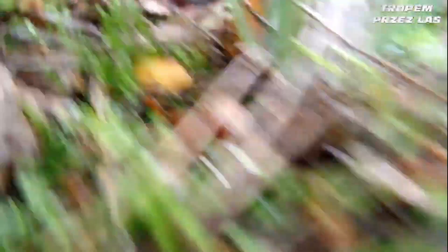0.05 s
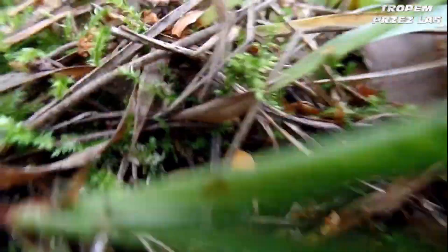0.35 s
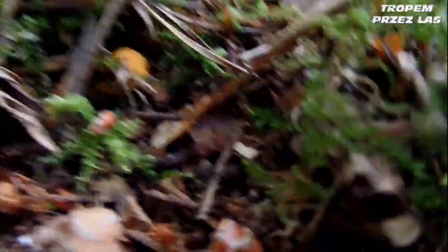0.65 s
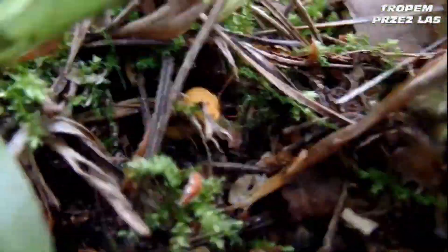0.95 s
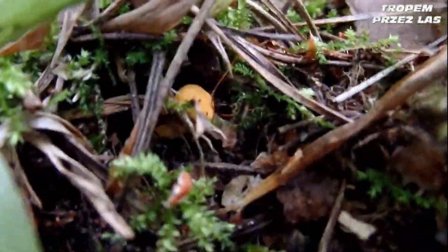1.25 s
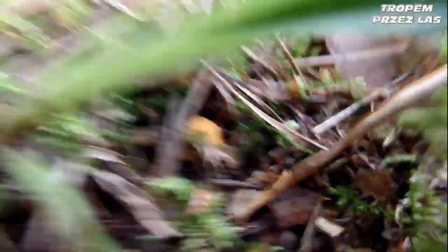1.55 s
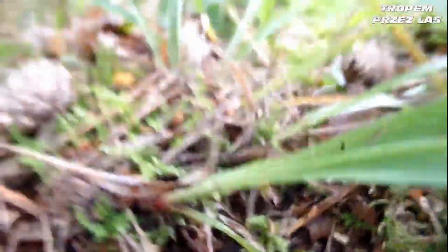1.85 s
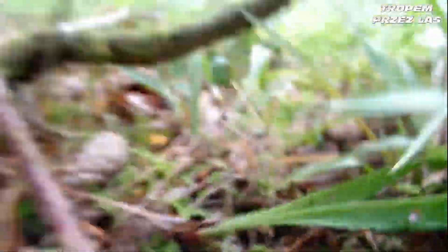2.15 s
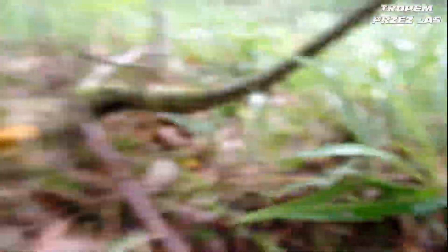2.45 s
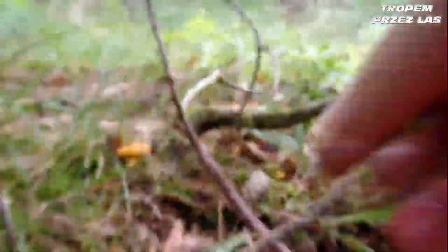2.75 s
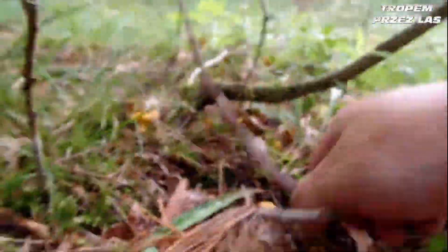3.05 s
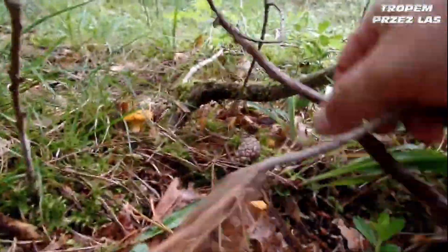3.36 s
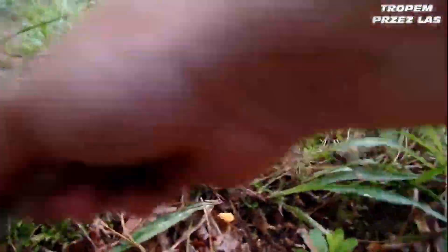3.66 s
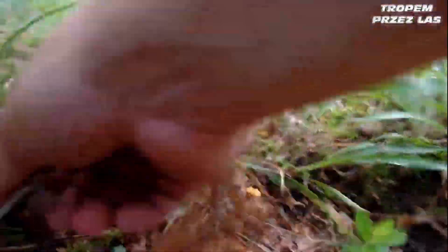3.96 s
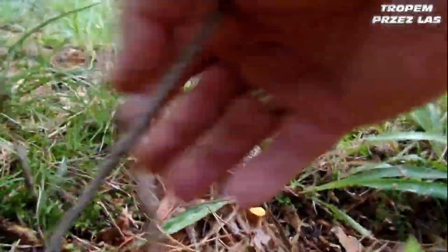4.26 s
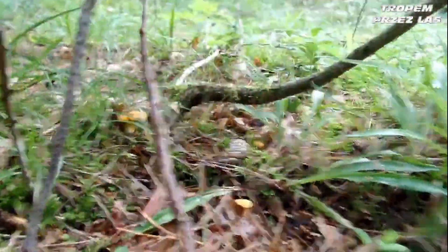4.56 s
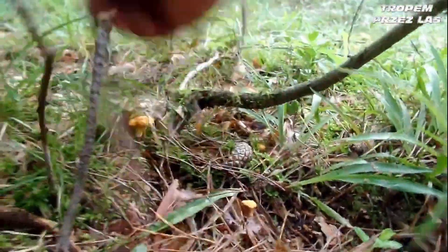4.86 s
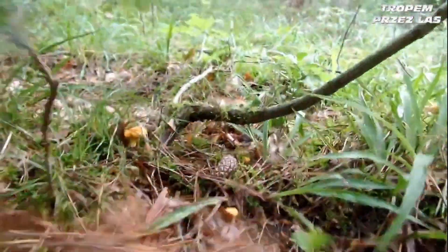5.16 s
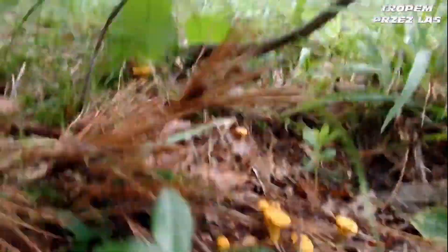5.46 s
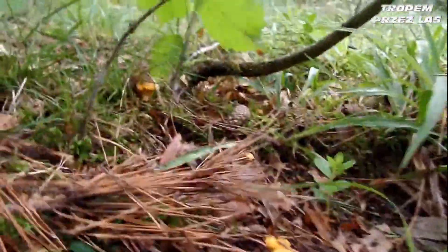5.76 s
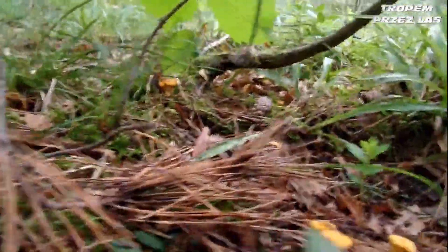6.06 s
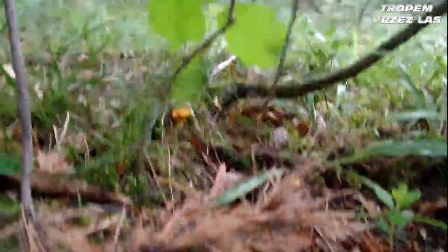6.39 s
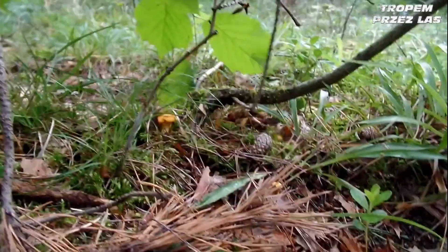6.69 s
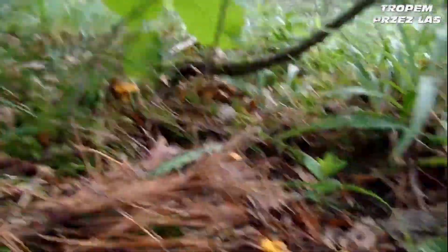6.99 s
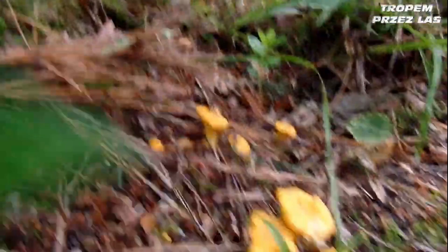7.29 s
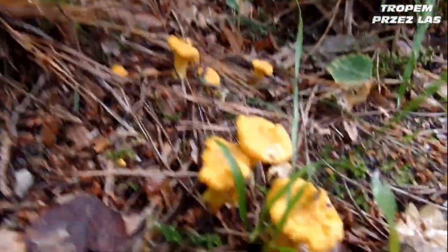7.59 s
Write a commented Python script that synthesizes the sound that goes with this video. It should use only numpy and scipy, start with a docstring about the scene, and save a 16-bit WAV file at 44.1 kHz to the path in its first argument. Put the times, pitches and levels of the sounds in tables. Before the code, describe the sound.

Dry forest litter rustles and crackles close by as a branch is pulled through it, with twig snaps, microphone knocks and faint bird calls.

```python
"""A dead pine branch is dragged over dry needles and leaves, which rustle, crackle and snap.
The rustle is rubbing noise roughened by tiny fractures; it swells and brightens with each pull.
Twigs knock together and ring. Stalks scrape and tap a small camera pushed through the undergrowth,
hardest at the start, and its body takes soft bumps. Near the end a small bird gives four thin calls
among the trees. A faint low rumble lies under it all."""
import sys
import numpy as np
from scipy import signal
from scipy.fft import rfft, irfft, next_fast_len
from scipy.io import wavfile
from scipy.ndimage import uniform_filter1d, map_coordinates

SR = 44100
rng = np.random.default_rng(int(sys.argv[2]) if len(sys.argv) > 2 else 0)


def wav_record(signal):
    """Record a signal, one row per channel, as 16-bit PCM in the file named by sys.argv[1]."""
    frames = np.transpose(np.atleast_2d(signal))
    bounded = np.clip(frames, -1, 1)
    # unit amplitude maps onto the largest positive 16-bit level
    quanta = np.round(bounded * 32767).astype(np.int16)
    wavfile.write(sys.argv[1], SR, quanta)


N = 336483

# Levels in the tables are relative; each layer trims its own gain.
# steady pulls through the litter: t/s, length/s, effort/dB
DRAGS = [(0.051, 0.61, -51), (0.755, .12, -55.5), (1.463, 0.48, -61.5), (1.588, .09, -55),
         (1.956, 0.17, -52), (2.213, 0.16, -51.5), (2.47, 0.53, -56), (3.07, .53, -49),
         (3.613, 0.49, -46.5), (4.122, 0.2, -55), (4.355, 0.66, -60.5), (4.86, 0.786, -46.5),
         (5.082, 0.39, -40.5), (5.666, 0.41, -51.5), (6.14, 0.657, -56), (6.963, .25, -55)]
# tufts caught and let go: peak t/s, decay/s, scrape/dB, fizz/dB, shuffle/dB
SWISHES = [(0.098, 0.012, -57, -50, -53), (0.219, .025, -42, -41.5, -60), (0.373, 0.0093, -47, -33, -39.5),
           (0.411, .035, -34.5, -36, -48), (.518, 0.0095, -36, -41, -37.5), (0.631, .015, -60, -38.5, -67),
           (1.57, 0.018, -37.5, -50, -47.5), (2.014, 0.042, -34.5, -33, -39.5),
           (2.219, 0.023, -38.5, -43.5, -43.5), (2.332, 0.017, -38, -59, -65),
           (2.516, 0.0069, -40, -35.5, -44), (2.824, 0.03, -43.5, -42.5, -53.5),
           (3.098, 0.024, -51, -38, -56), (3.681, 0.029, -30, -31.5, -49), (3.904, 0.024, -39.5, -37, -53),
           (4.087, 0.02, -43, -39.5, -65), (4.62, 0.047, -57, -54.5, -64), (5.094, .015, -35, -22.5, -41),
           (5.201, .03, -44, -36.5, -49), (5.304, 0.016, -33, -24, -44), (5.346, 0.023, -28, -26.5, -33.5),
           (5.58, 0.034, -48, -37.5, -46), (5.914, 0.038, -46, -43.5, -70), (6.03, .035, -41, -40.5, -50),
           (6.11, 0.046, -45, -47, -48.5), (6.437, 0.062, -52, -52, -56), (6.603, 0.015, -51, -45.5, -54),
           (7.51, 0.074, -60, -61.5, -62.5)]
# EQ curves of leaf scrape, needle fizz and ground shuffle: f/Hz, level/dB
SCRAPE_EQ = [(200, -17), (450, 1), (700, -1.5), (1300, 3.5), (2200, -1), (3300, 1.5), (5000, -1),
             (6500, -12.5), (9000, -10.5)]
FIZZ_EQ = [(3500, -5), (5500, -1), (7000, -0.5), (9000, 0.5), (12000, 2), (15500, 3.5), (16500, -50)]
SHUFFLE_EQ = [(20, -22), (60, -5.5), (130, 0), (200, -1), (400, -5.5), (600, -5.5), (1200, -10.5)]
# featured snaps of needles and dry leaves: t/s, woody body/dB, bright crack/dB
SNAPS = [(0.1591, -57, -33.5), (.2015, -59, -28), (0.247, -35, -31), (0.3734, -33, -27),
         (0.516, -22.5, -25.5), (.6643, -46, -32), (2.0198, -23.5, -37), (2.0234, -25, -38),
         (2.5588, -29, -31.5), (2.7805, -34.5, -28), (2.7852, -50, -23), (3.083, -60, -31),
         (3.2988, -48, -30.5), (3.6423, -22.5, -22), (3.677, -34, -33), (3.7004, -25, -31),
         (3.8668, -51, -19.5), (3.9318, -32, -39), (4.8586, -42, -31.5), (5.0733, -19.5, -31),
         (5.0793, -25, -23), (5.092, -33.5, -22), (5.127, -24, -23), (5.1339, -20.5, -16),
         (5.139, -21.5, -27), (5.298, -21.5, -27.5), (5.3056, -19, -36), (5.3302, -23.5, -17.5),
         (5.335, -25, -21), (5.349, -25, -27), (5.4724, -29, -47), (5.5895, -41, -30.5), (6.394, -38, -42),
         (6.4535, -45, -40), (6.7555, -40.5, -42), (6.986, -38, -27.5), (7.1794, -46, -36)]
# EQ curves of that body and crack: f/Hz, level/dB
WOODY_EQ = [(100, -6.5), (400, -3.5), (1300, -3), (2500, -2), (4500, -2), (6000, -15.5), (9000, -17.5)]
CRACK_EQ = [(2500, -40.5), (5000, -2.5), (7500, -4), (11000, 3), (16000, 3)]
# twigs knocking together: t/s, level/dB, f/Hz
TWIG_TICKS = [(1.296, -45.5, 900), (1.652, -29, 3800), (1.7585, -38, 1730), (2.1774, -23, 4000),
              (2.5625, -18.5, 4450), (2.651, -28.5, 5300), (3.2352, -25.5, 2440), (3.4702, -28, 2550),
              (3.620, -23, 2750), (3.6423, -13, 2290), (3.938, -21.5, 2750), (4.0602, -15, 4300),
              (4.3184, -32, 5300), (4.4352, -39, 1200), (4.9028, -21, 3600), (6.455, -34, 1630),
              (6.7565, -34.5, 850), (6.960, -38, 810)]
# stalks hitting the camera: t/s, peak/dB, ring f/Hz, ring t60/s, ring level/dB, cutoff/Hz
STALK_TAPS = [(0.0492, -2.5, 1336, 0.022, -24, 5550), (0.2254, -15.5, 1904, 0.025, -21, 5160),
              (0.4039, -15, 842, 0.0046, -7, 1800), (0.4114, -3.5, 1262, 0.012, -14, 4470),
              (.5229, 0, 1897, 0.013, -15.5, 4640), (2.2025, -23, 1130, 0.012, -14.5, 5000),
              (2.2143, -20, 1444, .01, -13, 5200), (2.5164, -12, 1790, 0.016, -24, 5970),
              (2.561, -25.5, 1250, 0.0065, 3.5, 4630), (4.585, -31, 1420, 0.016, 13, 3000),
              (5.5892, -24, 3830, 0.013, 4, 5600)]
# resonances of the camera case: f/Hz, level/dB, t60/s
CASE_MODES = [(557, -12, 0.0087), (1274, -13, 0.013), (2220, 3.5, 0.0036), (3410, 1, 0.0031),
              (4100, 2, 0.0047), (4800, -12, 0.016)]
# soft pushes on the camera body: t/s, level/dB, f/Hz, t60/s
BODY_BUMPS = [(0.38, -33, 62.5, .08), (0.41, -27.5, 298, 0.045), (0.522, -64, 200, 0.015),
              (1.557, -37, 352, .04), (2.021, -28.5, 440, 0.028), (2.026, -35, 85, 0.056),
              (2.216, -36, 61.6, 0.096), (2.322, -43, 55, .06), (2.518, -20, 140, 0.014),
              (2.561, -36, 348, 0.051)]
# the bird's two note shapes: t/s into the note, f/Hz, level/dB
LEVEL_NOTE = [(0, 4320, -3), (.025, 4220, -2), (.09, 4210, -3)]
FALLING_NOTE = [(0, 6800, -5), (.015, 5540, 2.5), (.036, 5490, 0), (.05, 4080, 3), (0.067, 3620, -7),
                (.092, 3480, -14), (.113, 4100, -17)]
# its calls: t/s, note shape, level/dB, fade/(dB/s)
BIRD_CALLS = [(6.32, LEVEL_NOTE, -52, 0), (6.706, FALLING_NOTE, -46.5, 163), (7.103, LEVEL_NOTE, -51.5, 89),
              (7.452, FALLING_NOTE, -51, 2)]

DRAG_RISE_S, DRAG_SETTLE_S = .031, .064  # time to swell or die by a factor e
REST_DB, USUAL_DB = -68, -50  # effort at rest and in an ordinary drag
FIZZ_DB, SHUFFLE_DB = -47.5, -56  # faders in an ordinary drag
FIZZ_GROWS, SHUFFLE_GROWS = 1.16, .6  # dB per dB of effort: harder is brighter
SWISH_RISE = .85  # rise time over decay time
TOP_HZ = 16050  # the camera's band limit


def branch_drag():
    """Fader curves in dB for scrape, fizz and shuffle: they ride the effort, with swishes on top."""
    pulls = sum((amp(db) * swell(s, length, DRAG_RISE_S, DRAG_SETTLE_S)) ** 2 for s, length, db in DRAGS)
    effort = 10 * np.log10(amp(2 * REST_DB) + pulls) - USUAL_DB
    power = amp([USUAL_DB + effort, FIZZ_DB + FIZZ_GROWS * effort,
                 SHUFFLE_DB + SHUFFLE_GROWS * effort]) ** 2
    for s, decay, *levels_db in SWISHES:
        power += np.outer(amp(levels_db), swell(s, 0, SWISH_RISE * decay, decay)) ** 2
    return 10 * np.log10(power)


def rustle(faders):
    """Sliding litter: three bands of rubbing that share one crackle, plus flicking twigs and needles."""
    scrape_db, fizz_db, shuffle_db = faders
    fractures = crackle(per_s=170, spread_db=5, t60=.022)
    twigs = pings(per_s=450, centre_hz=2900, octaves=1, cycles=15, spread_db=4)
    flicks = pings(per_s=900, centre_hz=9500, octaves=.75, cycles=20, spread_db=4)
    leaf_rub = shifting(noise(SCRAPE_EQ), depth_db=3.2)
    needle_rub = shifting(noise(FIZZ_EQ), depth_db=2.6)
    leaves = leaf_rub * np.sqrt(amp(-7) + amp(-9) * fractures) + amp(-6.5) * twigs
    needles = needle_rub * np.sqrt(amp(-6) + amp(-8) * fractures) + amp(-6.5) * flicks
    ground = noise(SHUFFLE_EQ) * np.sqrt(amp(-1.5) + amp(-12.5) * fractures)
    return amp(scrape_db) * leaves + amp(fizz_db) * needles + amp(shuffle_db) * ground


def crackle(per_s, spread_db, t60):
    """Energy envelope, mean 1, of tiny fractures that strike at random and die fast."""
    sizes = amp(2 * spread_db * np.clip(rng.standard_normal(N), -2, 2))
    hits = (rng.random(N) < per_s / SR) * sizes
    energy = signal.lfilter([1], [1, -amp(-120 / (t60 * SR))], hits)
    return energy / energy.mean()


def pings(per_s, centre_hz, octaves, cycles, spread_db, size=256):
    """A grain cloud of twigs or needles flicking free, each ringing briefly at its own pitch."""
    when, pitch, strength = rng.random((int(per_s * N / SR), 3)).T
    hz = np.minimum(centre_hz * 2 ** (octaves * (2 * pitch - 1)), TOP_HZ)[:, None]
    t = np.arange(size) / SR
    db = spread_db * np.minimum(-np.log(1 - strength), np.pi + 1)  # many soft, a few loud
    grains = amp(db[:, None] - 60 * t * hz / cycles) * np.sin(2 * np.pi * hz * t)
    where = (when * N).astype(int)[:, None] + np.arange(size)
    return unit(np.bincount(where.ravel(), grains.ravel(), N)[:N])


def shifting(rub, depth_db, size=512):
    """Ever new leaves touch, so small resonances come and go."""
    spectra = signal.stft(rub, nperseg=size)[2]
    ripple = uniform_filter1d(rng.standard_normal(spectra.shape), size=3, axis=0)  # smooth in frequency
    ripple = uniform_filter1d(ripple, size=5, axis=1)  # and in time
    return unit(signal.istft(spectra * amp(depth_db * unit(ripple)), nperseg=size)[1][:N])


def snaps(faders, size=1024):
    """Each break is a sharp spike and a short splintering tail, with woody body and bright crack."""
    out, t = np.zeros(N), np.arange(size) / SR
    fade = amp(-60 * t / .013) + amp(-5 - 60 * t / .0009)
    for s, body_db, crack_db in SNAPS + lesser_snaps(faders):
        burst = np.pad(fade * rng.standard_normal(size), (size, 0))  # room for the EQ's pre-ring
        body, crack = unit(coloured(burst, WOODY_EQ)), unit(coloured(burst, CRACK_EQ))
        add(out, s - size / SR, amp(body_db - 16.5) * body + amp(crack_db - 13.5) * crack)
    return out


def lesser_snaps(faders, per_s=9, spread_db=3):
    """Chance breaks that follow the rustle's level: rows of t/s, body/dB, crack/dB."""
    when, body, crack = rng.random((int(per_s * N / SR), 3)).T
    scrape_db, fizz_db, _ = faders[:, (when * N).astype(int)]
    body_db = scrape_db + 2.5 + spread_db * (2 * body - 1)
    crack_db = fizz_db + 8 + spread_db * (2 * crack - 1)
    return list(zip(when * N / SR, body_db, crack_db))


def twig_ticks(size=2048):
    """A thin twig rings briefly in a close pair of bending modes, with a dry rasp."""
    out, t = np.zeros(N), np.arange(size) / SR
    for s, db, hz in TWIG_TICKS:
        upper_hz = hz * rng.uniform(1.05, 1.15)
        ring = np.sin(2 * np.pi * hz * t) + amp(-7) * np.sin(2 * np.pi * upper_hz * t)
        fade = amp(-60 * t * hz / 36)  # gone in 36 cycles
        add(out, s, amp(db) * fade * (ring + amp(-10) * noise(WOODY_EQ, size)) / 2)
    return out


def stalk_taps(size=4096):
    """A stalk rings briefly with the case it hits; each tap has its own brightness."""
    out, t = np.zeros(N), np.arange(size) / SR
    for s, db, ring_hz, ring_t60, ring_db, cutoff_hz in STALK_TAPS:
        modes = CASE_MODES + [(ring_hz, ring_db + 15, ring_t60)]
        ring = sum(amp(level - 60 * t / t60) * np.cos(2 * np.pi * hz * t) for hz, level, t60 in modes)
        ring += amp(-11) * np.roll(ring, round(2 * SR / ring_hz))  # it strikes again two cycles later
        ring += amp(-43 - 60 * t / .043) * rng.standard_normal(size)  # the plant shivers on
        knock = lowpass(ring, cutoff_hz, order=10) + amp(-28.5) * ring
        knock -= lowpass(knock, 220, order=1)  # the knock keeps little bass
        add(out, s, amp(db) * knock / np.abs(knock).max())
    return out


def body_bumps(size=8192):
    """Pushes on the camera make low, heavily damped thuds."""
    out, t = np.zeros(N), np.arange(size) / SR
    for s, db, hz, t60 in BODY_BUMPS:
        add(out, s, amp(db + .5 - 60 * t / t60) * np.sin(2 * np.pi * hz * t))
    return out - lowpass(out, 45, order=1)  # the deepest bass is rolled off


def bird(waver_hz=55, wavers_per_s=140, forest_t60=.62):
    """Thin, wavering whistles, level and falling in turn; the trunks scatter them into a short reverb."""
    song = np.zeros(N)
    for s, note, call_db, fade_db_per_s in BIRD_CALLS:
        t = np.arange(0, note[-1][0], 1 / SR)
        hz, db = curves(note, t)
        hz += waver_hz * map_coordinates(rng.standard_normal(len(t)), [t * wavers_per_s])
        whistle = np.sqrt(2) * np.sin(2 * np.pi * np.cumsum(hz) / SR)
        envelope = amp(call_db + db - fade_db_per_s * t) * signal.windows.tukey(len(t), .15)
        add(song, s, envelope * whistle)
    tail = rng.standard_normal(SR) * amp(-60 * np.arange(SR) / SR / forest_t60)
    reverb = signal.fftconvolve(song, tail / np.linalg.norm(tail))[:N]
    return amp(-3) * song + amp(-4) * reverb


def rumble():
    """The faint low bed of a hand-held camera in open air."""
    return amp(-68.5) * noise([(15, -13), (60, -4.5), (120, -14.5), (300, -22.5)])


def amp(db):
    """Decibels to gain."""
    return 10 ** (np.asarray(db) / 20)


def unit(x):
    """Scale to rms 1."""
    return x / np.sqrt(np.mean(x ** 2) + 1e-20)


def add(track, s, sound):
    """Mix a sound into the track at time s."""
    start = max(round(s * SR), 0)
    track[start:start + len(sound)] += sound[:N - start]


def swell(start, hold, rise, settle):
    """Attack, hold and release of one movement."""
    t = np.arange(N) / SR - start
    return np.exp(np.minimum(t, 0) / rise - np.maximum(t - hold, 0) / settle)


def curves(rows, t):
    """Breakpoint curves, one per column after the time, read at times t."""
    times, *columns = np.transpose(rows)
    return [np.interp(t, times, column) for column in columns]


def coloured(x, eq):
    """EQ x through points of f/Hz, level/dB on a log frequency axis."""
    hz, db = np.transpose(eq)
    f = np.fft.rfftfreq(len(x), 1 / SR)
    gain = amp(np.interp(np.log(f + 1), np.log(hz), db, left=-90, right=-90))
    return irfft(rfft(x) * gain, len(x))


def noise(eq, size=N):
    """Coloured noise of rms 1."""
    return unit(coloured(rng.standard_normal(next_fast_len(size)), eq)[:size])


def lowpass(x, hz, order):
    """Roll off the top above hz."""
    return signal.sosfilt(signal.butter(order, min(hz, SR / 2 - 1), fs=SR, output="sos"), x)


def scene():
    """The mono mix at one close microphone."""
    faders = branch_drag()
    mix = rustle(faders) + twig_ticks() + stalk_taps() + body_bumps() + bird() + rumble() + snaps(faders)
    return mix[None]


def record(dry):
    """The camera keeps nothing above its band limit."""
    size = next_fast_len(N + SR)
    passband = np.fft.rfftfreq(size, 1 / SR) < TOP_HZ
    return irfft(rfft(dry, size) * passband, size)[:, :N]


dry = scene()
out = record(dry)
wav_record(out)
```